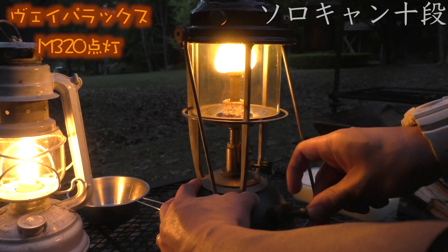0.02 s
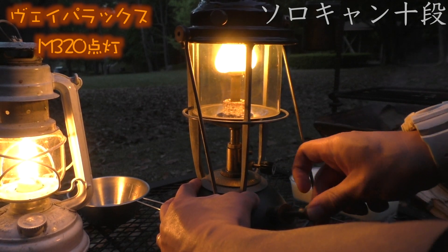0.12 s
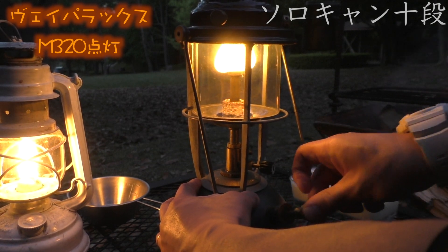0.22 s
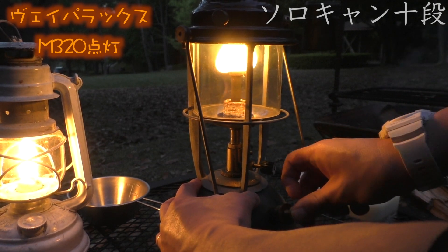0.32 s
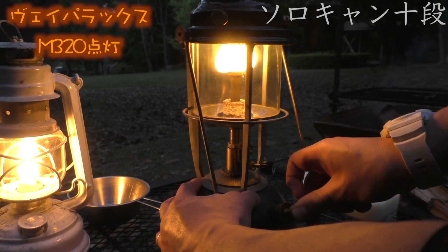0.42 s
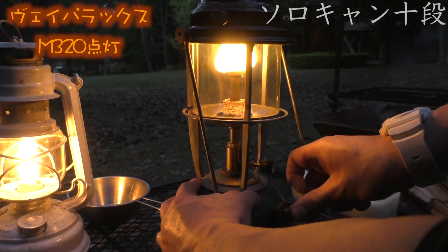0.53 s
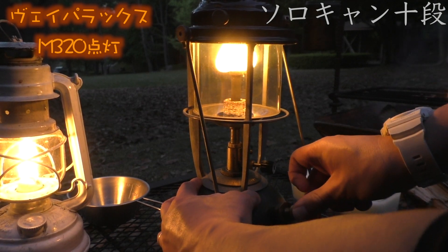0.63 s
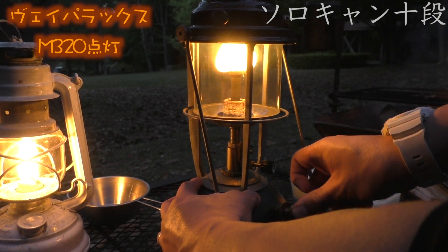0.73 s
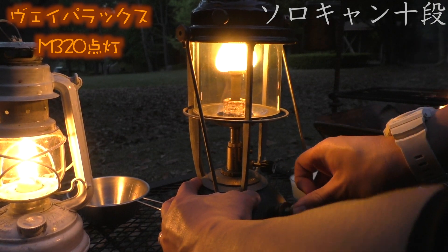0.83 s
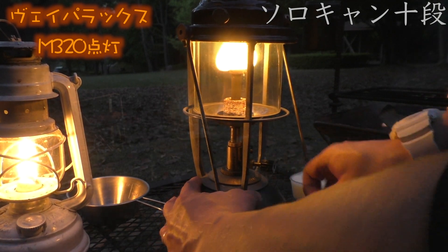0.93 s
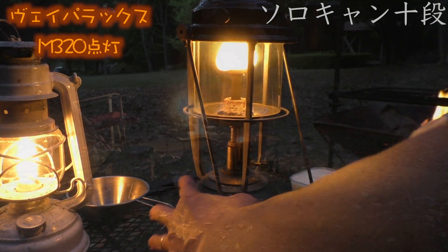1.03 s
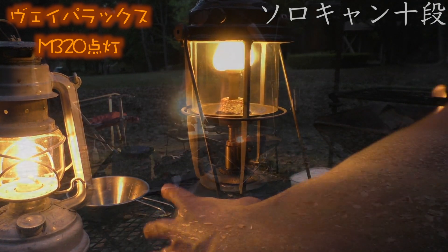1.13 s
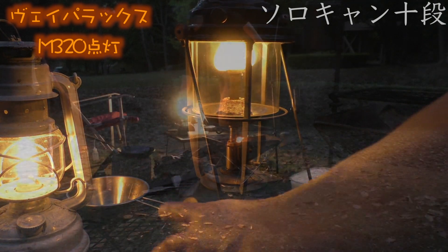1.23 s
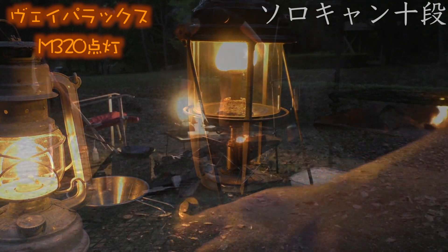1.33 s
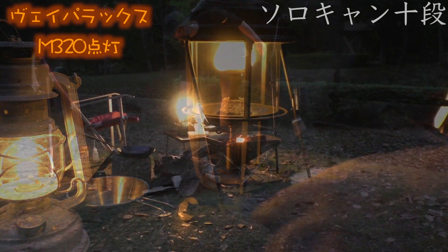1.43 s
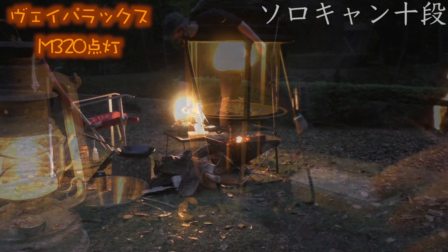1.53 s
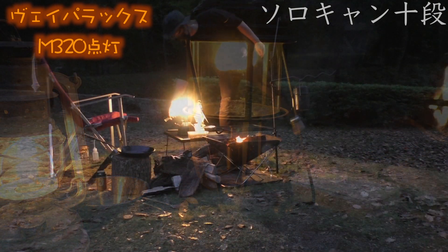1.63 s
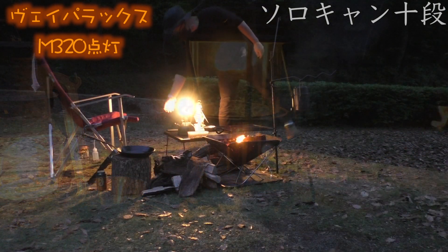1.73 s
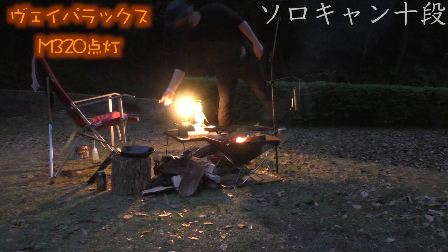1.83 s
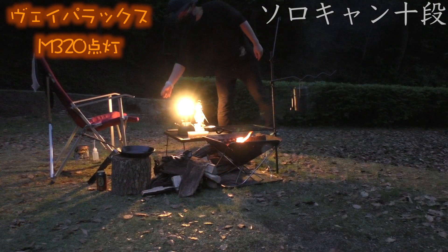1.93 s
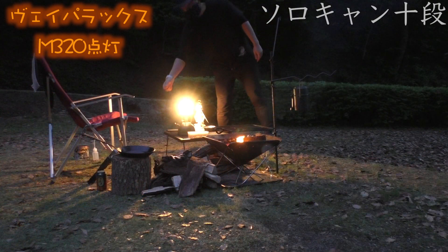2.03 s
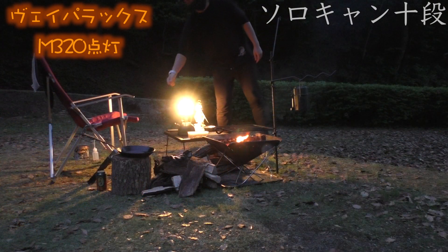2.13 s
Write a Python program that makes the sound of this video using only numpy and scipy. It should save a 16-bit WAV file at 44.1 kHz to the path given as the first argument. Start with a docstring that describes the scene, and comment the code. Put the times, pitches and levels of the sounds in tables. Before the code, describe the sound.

A lantern pump stroke, close and dry, over soft steady burner hiss outdoors: from 0.22 seconds the rod judders and rasps, then snaps brightly and clacks hard at 0.31-0.34. Hands rub and softly knock the hollow tank until about 1.3, with a short knob squeak at 0.92 and a metallic tick and knock near 0.95-1.0. Close hiss fades by 1.7, leaving fainter, wider hiss and tiny fire crackles.

```python
"""A pressure lantern hisses close by as its hand pump judders, snaps and clacks; hands rub and knock the tank,
and the knob squeaks once. The close hiss fades, leaving a fainter, wider hiss and a faintly crackling fire.
Hiss, rubbing and rasping are coloured noise. Struck metal is a set of fading sine waves with noise bursts.
The squeak is a stack of sine waves, and the fire is random clicks. Short reflections surround the close sounds."""
import sys
import numpy as np
from scipy import signal
from scipy.fft import rfft, irfft
from scipy.io import wavfile
from scipy.ndimage import minimum_filter1d, map_coordinates

SR = 44100
rng = np.random.default_rng(int(sys.argv[2]) if len(sys.argv) > 2 else 0)


def transcribe(u):
    """Save the signal u as a 16-bit wav file named by the first command-line argument.

    u: samples, shape (n,) or (channels, n), limited to [-1, 1]; the rate is SR.
    q: integer samples, one column per channel.
    """
    v = np.clip(np.atleast_2d(u).T, -1, 1)
    q = np.round(v * 32767).astype(np.int16)
    wavfile.write(sys.argv[1], SR, q)


N = 97020  # samples: 2.2 s
T = np.arange(N) / SR  # time of each sample, s
HZ = np.fft.rfftfreq(2 * N, 1 / SR)  # frequencies that the filters work on


def amp(db):
    """Turn decibels into a multiplying gain."""
    return 10 ** (np.asarray(db) / 20)


def unit(x):
    """Scale a sound so that its average strength (rms) is 1."""
    return x / np.sqrt(np.mean(x ** 2) + 1e-20)


def curve_over_hz(points):
    """Join (f/Hz, value) points with lines on a logarithmic frequency axis."""
    f, value = np.transpose(points)
    return np.interp(np.log(HZ + 1), np.log(f + 1), value)


def gain_over_time(points):
    """Join (t/s, level/dB) points and give the gain at every sample."""
    return amp(np.interp(T, *np.transpose(points)))


def wobble(rate):
    """Draw a smooth random curve through `rate` random points a second."""
    return map_coordinates(rng.standard_normal(4096), [T * rate], mode="wrap")


def filtered(x, gain):
    """Multiply each frequency of a sound by its own gain."""
    return irfft(rfft(x, 2 * N) * gain)[..., :N]


def noise(colour_db):
    """Make noise of rms 1, its frequencies balanced by a curve in dB."""
    return unit(filtered(rng.standard_normal(N), amp(colour_db)))


def wide_noise(colour, alike):
    """Make stereo noise of rms 1 by mixing a shared part with a part opposite in the two ears."""
    turn = np.arccos(np.clip(curve_over_hz(alike), -1, 1)) / 2
    colour_gain = amp(curve_over_hz(colour))
    mid, side = filtered(rng.standard_normal((2, N)), colour_gain * [np.cos(turn), np.sin(turn)])
    return unit(np.array([mid + side, mid - side]))


def resonance_db(hz, width):
    """Shape one resonance in dB; width is the distance to its 3 dB points as a fraction of hz."""
    return -10 * np.log10(1 + ((HZ / hz - 1) / width) ** 4)


def strike(start, attack, t60):
    """Rise quickly, then die away by 60 dB every t60 seconds; cut off after two of them."""
    out = np.zeros(N)
    span = slice(*np.searchsorted(T, [start, start + 2 * t60]))
    t = T[span] - start
    out[span] = (1 - np.exp(-t / attack)) * 1e-3 ** (t / t60)
    return out


def ringing(modes, start, attack):
    """Ring metal with fading sine waves that all start at one moment, each at a random phase."""
    out = np.zeros(N)
    for hz, db, t60 in modes:
        tone = np.sin(2 * np.pi * (hz * (T - start) + rng.random()))
        out += amp(db) * strike(start, attack, t60) * tone
    return out


def grit(colour_db, per_s):
    """Make friction noise of rms 1 from sparse random grains, per_s of them a second on average."""
    grains = rng.standard_normal(N) * (rng.random(N) < per_s / SR)
    return unit(filtered(grains, amp(colour_db)))


def pan(x, left_db):
    """Make the left left_db louder than the right; a negative value leans right."""
    return x * amp([[left_db / 2], [-left_db / 2]])


def hiss(flutter_db):
    """The vapour jet hisses through the burner as noise, over a wide campsite hiss and a low outdoor rumble."""
    # levels over time: t/s, level/dB
    burner = [(0, -44), (.35, -42.5), (.7, -43), (1.12, -44.5), (1.3, -48.5), (1.5, -53.5), (1.7, -59.5),
              (2.2, -62)]
    distant = [(0, -49), (.7, -49.5), (1.25, -51), (1.5, -51), (1.7, -50), (1.9, -49), (2.2, -50)]
    rumble = [(0, -49), (.7, -52), (1.25, -52.5), (1.5, -56), (2.2, -54.5)]
    swell = [(0, -70), (.8, -62), (1.03, -49.5), (1.25, -53.5), (1.42, -69), (2.2, -82)]  # one burner resonance
    # colours: f/Hz, relative level/dB
    burner_colour = [(100, -11), (300, 6), (600, -4.5), (1200, 0), (1650, -7), (2150, 1), (3200, -16),
                     (4100, -1), (4500, -7.5), (5050, 2.5), (5850, -14.5), (6400, -0.5), (7100, -9.5),
                     (8000, -6), (8800, 0.5), (9800, -10.5), (11300, 0), (11700, 0.5), (12100, 3.5),
                     (12650, -11), (13100, -0.5), (13900, -14), (15100, -5.5), (16000, -9)]
    distant_colour = [(100, -7), (400, -1.5), (700, -10), (1200, 2.5), (1600, 1.5), (2500, 0), (3500, -3.5),
                      (4900, -4.5), (5800, -10.5), (6450, -8.5), (7000, -10), (8400, -16.5), (9100, -8),
                      (11300, -10), (12300, -8), (14300, -10.5), (16000, -9)]
    rumble_colour = [(20, -33), (40, -4.5), (80, -2), (160, 2.5), (280, 0.5), (420, -5), (650, -21),
                     (2000, -52)]
    # likeness of left and right: f/Hz, likeness (1 = the same in both ears, 0 = unrelated)
    burner_alike = [(100, 0.52), (500, 1), (9000, 0.98), (15000, 0.91)]
    distant_alike = [(200, .5), (1000, 0.76), (2500, 0.47), (5000, 0.69), (7000, 1), (9500, 1),
                     (15000, 0.22)]
    rumble_alike = [(30, .6), (120, 0.56), (400, 0.75)]

    near = gain_over_time(burner) * amp(flutter_db * wobble(59.86)) * wide_noise(burner_colour, burner_alike)
    far = gain_over_time(distant) * amp(0.85 * wobble(25.07)) * wide_noise(distant_colour, distant_alike)
    air = gain_over_time(rumble) * amp(0.7 * wobble(12.07)) * wide_noise(rumble_colour, rumble_alike)
    swelling = gain_over_time(swell) * noise(resonance_db(hz=8780, width=0.044))
    return pan(near + swelling, -0.26) + far + pan(air, 2.5)


def judder(grains_per_s):
    """The pump rod breaks free and rings the barrel, then sticks and slips; each slip rasps and booms."""
    # slips of the rod: t/s, tank boom level/dB, rasp level/dB
    slips = [(0.2229, -25, -22), (0.227, -23, -29), (.238, -34, -35), (0.2451, -30, -27),
             (0.25, -30.5, -21.5), (0.2633, -24, -26.5), (0.2694, -30, -29), (.2778, -33, -19.5),
             (0.2835, -30, -40), (0.2914, -28.5, -22.5), (0.3024, -33, -18.5), (0.3091, -28, -29)]
    # colours of boom and rasp: f/Hz, relative level/dB
    body_colour = [(60, -30), (200, -14), (450, -6.5), (680, -2), (1030, -3), (1350, -16), (1800, -15),
                   (2300, -18), (3300, -22), (8000, -34)]
    rasp_colour = [(400, -26), (1800, 4.5), (2600, -4.5), (3600, -12), (4550, 0), (5300, -7), (6200, -1.5),
                   (7000, -8), (8300, -2.5), (9500, -9.5), (12000, -14), (15500, -24)]
    # ringing of the barrel: f/Hz, relative level/dB, time to fall 60 dB/s
    barrel_modes = [(487, -8, 0.061), (683, -1, .09), (1046, -3.5, 0.11), (4660, -4.5, 0.043),
                    (7480, -8, .04)]
    attack_s, body_t60_s, rasp_t60_s = 0.0015, 0.1, 0.037
    breakaway_s, breakaway_db = .2245, -19.5

    body_power, rasp = np.zeros(N), np.zeros(N)
    for s, body_db, rasp_db in slips:
        body_power += (amp(body_db) * strike(s, attack_s, body_t60_s)) ** 2
        rasp += amp(rasp_db) * strike(s, attack_s, rasp_t60_s)
    barrel = amp(breakaway_db) * ringing(barrel_modes, breakaway_s, attack_s)
    boom = body_power ** .5 * noise(curve_over_hz(body_colour))
    return barrel + boom + rasp * grit(curve_over_hz(rasp_colour), grains_per_s)


def thuds():
    """The plunger and the hand push dully on the tank: short bursts of low noise."""
    # pushes: t/s, level/dB
    pushes = [(.272, -44.5), (.29, -33), (0.335, -29), (1.18, -51)]
    # colour: f/Hz, relative level/dB
    thud_colour = [(25, -10), (60, 2), (100, -2), (170, 8.5), (300, -22), (1000, -60)]
    shape = sum(amp(db) * strike(s, attack=0.0014, t60=0.07) for s, db in pushes)
    return shape * noise(curve_over_hz(thud_colour))


def impact(contacts, modes, colour, ring_db, crack_db, crack_t60, tail_db, tail_t60, attack):
    """Metal hits metal: it rings and cracks, and loose parts buzz in a weaker tail of noise."""
    out = np.zeros(N)
    for s, db in contacts:
        crack = amp(crack_db) * strike(s, attack, crack_t60)
        tail = amp(tail_db) * strike(s, attack, tail_t60)
        ring = amp(ring_db) * ringing(modes, s, attack)
        out += amp(db) * (ring + (crack + tail) * noise(curve_over_hz(colour)))
    return out


def snap():
    """The rod snaps at the cap: two contacts, each a bright ring and crack."""
    # contacts: t/s, relative level/dB
    contacts = [(.3124, -4.5), (.3175, -15)]
    # ringing of the cap: f/Hz, relative level/dB, time to fall 60 dB/s
    cap_modes = [(1783, -10.5, 0.12), (3004, -7.5, 0.08), (4370, -7, 0.082), (5280, -2, 0.047),
                 (5830, -4, 0.034), (7300, -6, 0.026), (8290, -1, 0.052), (9300, -3, .05),
                 (10420, 4, 0.022), (10860, 4, .025), (11660, 8, 0.012), (12850, 1, .027)]
    # colour of the crack: f/Hz, relative level/dB
    cap_crack = [(100, -38), (600, -14), (1700, -12), (4000, -8), (5300, -3), (6600, -2.5), (8200, -2),
                 (9600, 1), (11800, -2.5), (13500, -7), (16000, -6.5)]
    return impact(contacts, cap_modes, cap_crack, ring_db=-11.5, crack_db=2.0, crack_t60=0.016,
                  tail_db=-14.5, tail_t60=0.14, attack=0.00012)


def clack():
    """The rod clacks against its stop: one contact with a ring and crack."""
    # contact: t/s, relative level/dB
    contacts = [(.3364, -0.96)]
    # ringing of the stop: f/Hz, relative level/dB, time to fall 60 dB/s
    stop_modes = [(1149, -17, 0.11), (1376, -3.5, 0.026), (1470, -4.5, 0.029), (2167, 5.5, 0.028),
                  (2770, -11.5, 0.065), (3916, -9.5, .05), (4310, -12.5, 0.043), (5580, -15, 0.047),
                  (7806, -10, 0.049), (8870, -8, 0.045), (10400, -21, 0.065), (12900, -33, 0.088)]
    # colour of the crack: f/Hz, relative level/dB
    stop_crack = [(60, -15), (300, -19), (800, -17), (1300, 3.5), (2200, -8.5), (3200, -4.5), (4500, -5),
                  (6600, -17), (8600, -10.5), (10000, -11), (11200, -23), (13000, -16), (16000, -22)]
    return impact(contacts, stop_modes, stop_crack, ring_db=-4.0, crack_db=1.5, crack_t60=0.017,
                  tail_db=-22, tail_t60=0.089, attack=0.00038)


def handling(rough_db):
    """Hands rub the tank as uneven noise and knock it so that it rings; small metal fittings tick."""
    # rubbing: t/s, level/dB
    rub = [(0, -59), (.35, -52), (.375, -41), (.425, -36), (.48, -37), (.53, -45.5), (.62, -39.5),
           (.73, -52.5), (.83, -50), (.95, -42), (1.02, -48.5), (1.15, -55.5), (1.31, -58.5), (1.42, -67),
           (2.2, -85)]
    # colours of the rubbing and of the tank: f/Hz, relative level/dB
    rub_colour = [(60, -23), (300, 2.5), (800, -0.5), (1500, 1.5), (2000, -7), (2800, -3.5), (4000, -7.5),
                  (8000, -13), (15000, -28)]
    tank_colour = [(80, -20), (300, -8), (480, -1.5), (650, -17), (900, 3), (1150, -24), (1500, -0.5),
                   (1950, -15), (2300, 1), (3000, -8.5), (3600, -8.5), (4300, -17.5), (9000, -20.5),
                   (15000, -43)]
    # soft knocks of the hand: t/s, level/dB, brightness/(dB per octave)
    knocks = [(0.37, -31, 5), (.406, -41, -5), (0.422, -30, 4.5), (.449, -39.5, 2), (.502, -44.5, -3),
              (.607, -35, 5), (.705, -42.5, -5), (.782, -44, 13), (.865, -39.5, -4), (.9893, -28, 0.5),
              (1.22, -40.5, -5.5), (1.269, -45, -5), (1.32, -43.5, -7)]
    # ringing of the tank: f/Hz, relative level/dB, time to fall 60 dB/s
    tank_modes = [(478, -5.5, 0.065), (899, -1, 0.061), (2308, -1.5, 0.054), (2780, -7, .035),
                  (3600, -9, 0.049)]
    # small metal ticks: t/s, level/dB, f/Hz
    ticks = [(0.94, -26, 8700), (0.938, -29, 12900), (0.9396, -33.5, 3000), (1.551, -34, 4870)]
    knock_attack_s, knock_t60_s, tank_ring_db = 0.00054, 0.059, -4

    roughness = amp(rough_db * np.tanh(wobble(170)))
    out = gain_over_time(rub) * unit(noise(curve_over_hz(rub_colour)) * roughness)
    octaves = np.log2((HZ + 100) / 1000)  # brightness tilts the colour about 900 Hz
    ring = amp(tank_ring_db) * ringing(tank_modes, 0, knock_attack_s)
    for s, db, bright in knocks:
        bump = strike(s, knock_attack_s, knock_t60_s) * noise(curve_over_hz(tank_colour) + bright * octaves)
        delayed_ring = np.interp(T - s, T, ring)
        out += amp(db) * (bump + delayed_ring)
    for s, db, hz in ticks:
        out += amp(db) * strike(s, attack=0.00034, t60=0.012) * noise(resonance_db(hz, width=.09))
    return out


def hollow_tones(waver):
    """Faint low sine tones swell and fade in the background, their pitch wavering slightly."""
    # tones: t/s, length/s, f/Hz, level/dB
    tones = [(0.875, .11, 335, -44.5), (1.225, 0.24, 825, -56), (1.273, .1, 452, -50),
             (1.837, 0.23, 354, -51.5), (1.996, .09, 275, -52)]
    out = np.zeros(N)
    for s, length, hz, db in tones:
        swell = np.sin(np.pi * np.clip((T - s) / length, 0, 1))
        wavering_hz = hz * (1 + waver * wobble(39.56))
        out += amp(db) * swell * np.sin(2 * np.pi * np.cumsum(wavering_hz) / SR)
    return out


def squeak(jitter, rise_s, fall_s):
    """The knob turns with a short squeak: stacked sine waves whose unsteady pitch sags a little."""
    # partials: multiple of the base pitch, level/dB
    partials = [(1, -41), (2, -35.5), (3, -55), (4, -53), (5, -50)]
    start_s, length_s = .917, 0.061
    rest_hz, extra_hz, sag_s = 855, 36.4, 0.0157  # starts extra_hz above its rest pitch

    t = np.maximum(T - start_s, 0)
    hz = (rest_hz + extra_hz * np.exp(-t / sag_s)) * (1 + jitter * wobble(300))
    phase = 2 * np.pi * np.cumsum(hz) / SR
    fade_in = np.clip(t / rise_s, 0, 1)
    fade_out = np.clip((length_s - t) / fall_s + .5, 0, 1)  # halfway down at length_s
    shape = fade_in * fade_out * amp(1.5 * wobble(120))
    return shape * sum(amp(db) * np.sin(round(k) * phase) for k, db in partials)


def campsite():
    """A soft, wide swish of noise passes; the wood fire pops faintly as randomly timed, filtered clicks."""
    # swish: t/s, level/dB
    swish_level = [(1.38, -91), (1.48, -49.5), (1.53, -49.5), (1.62, -55.5), (1.72, -68)]
    # colours of the swish and the pops: f/Hz, relative level/dB
    swish_colour = [(1000, -18), (3200, -6), (4400, 1), (6200, -3), (7500, 0), (11500, 1.5), (15500, -5)]
    pop_colour = [(300, -15), (1300, 8), (3000, 1), (6000, -9), (15000, -12)]
    fire_from_s, pops_per_s, click_db = 1.8, 45, -38  # click_db: typical size before colouring

    swish_alike = [(4000, .2), (7000, 0.93), (11000, .2)]  # f/Hz, left-right likeness
    swish = gain_over_time(swish_level) * wide_noise(swish_colour, swish_alike)
    happens = (rng.random(N) < pops_per_s / SR) * (T > fire_from_s)
    clicks = happens * amp(click_db + 2 * rng.standard_normal(N))
    return swish + filtered(clicks, amp(curve_over_hz(pop_colour)))


def early(x):
    """Glances off the lantern's metal and glass: a short noise echo, opposite in the two ears."""
    # colour: f/Hz, relative level/dB
    early_colour = [(200, 3), (1200, -6), (2700, 2), (4500, 3.5), (7500, -10), (10000, -3), (13000, 8)]
    glance = rng.standard_normal(N) * strike(0, attack=0.00015, t60=0.0096)
    echo = signal.fftconvolve(x, glance / np.linalg.norm(glance))[:N]
    side = filtered(echo, amp(-16.5 + curve_over_hz(early_colour)))
    return np.array([side, -side])


def surroundings(x):
    """Short reflections from the table and the things on it: an echo of fading noise for each ear."""
    tail = rng.standard_normal((2, N)) * strike(0.0011, attack=0.0009, t60=0.11)
    tail = filtered(tail, amp(curve_over_hz([(200, 10.5), (4000, 8), (15000, -24)])))
    tail = tail / np.linalg.norm(tail[0])
    return amp(-20) * signal.fftconvolve(x[None], tail, axes=1)[:, :N]


def scene():
    """One pump stroke and the handling after it, over the hiss and the campsite."""
    pump = judder(grains_per_s=9000) + thuds() + snap() + clack()
    knob = squeak(jitter=.009, rise_s=.005, fall_s=.02)
    close = pump + handling(rough_db=3.5) + knob
    reflections = early(close) + surroundings(close)
    background = hiss(flutter_db=1.48) + hollow_tones(waver=.008) + campsite()
    return pan(close, -0.51) + reflections + background


def record(dry):
    """Loud peaks turn the gain down for a moment and are rounded off; the treble above 15.9 kHz is removed."""
    ceiling, duck_db, top_hz = 1.0, 5.5, 15900
    attack_s, hold_s, release_s = 0.018, 0.065, 0.021
    # 0 up to half the ceiling, rising to 1 at the ceiling
    over = np.clip(np.abs(dry).max(axis=0) / ceiling - .5, 0, .5) * 2
    # hold each peak, let it fade, then smooth the movement
    hold = 2 * int(hold_s * SR / 2) + 1
    over = -minimum_filter1d(-over, hold, origin=hold // 2)
    fade = np.exp(-T / release_s)
    held = np.maximum.accumulate(over / fade) * fade
    follow = np.exp(-1 / (attack_s * SR))
    duck = signal.lfilter([1 - follow], [1, -follow], held)
    x = dry * amp(-duck_db * duck)
    x = x / (1 + np.abs(x / ceiling) ** 6) ** (1 / 6)  # round off the peaks
    return filtered(x, 1 / (1 + (HZ / top_hz) ** 200))


dry = scene()
out = record(dry)
transcribe(out)
```